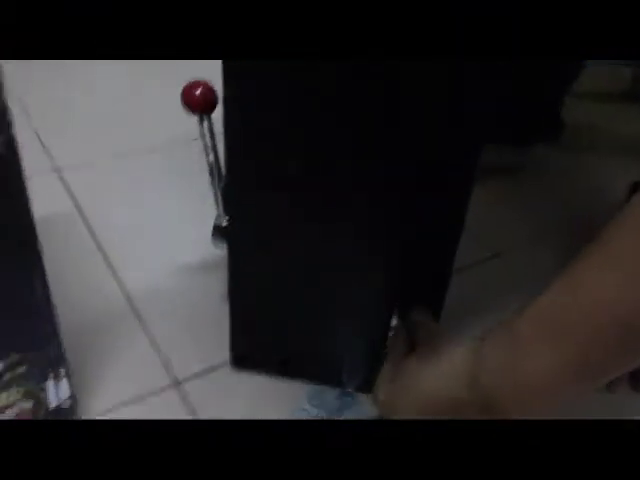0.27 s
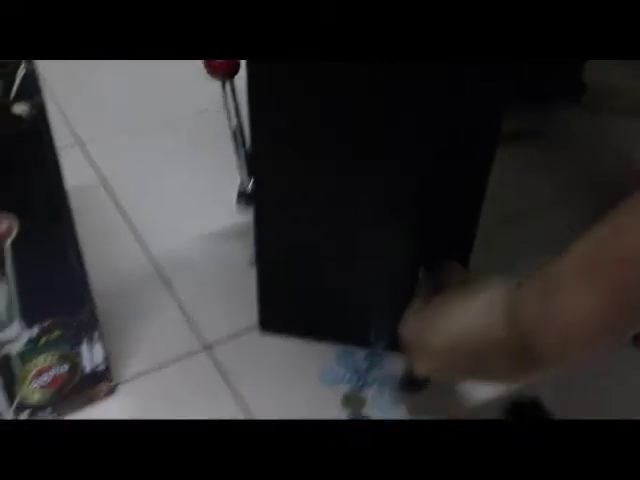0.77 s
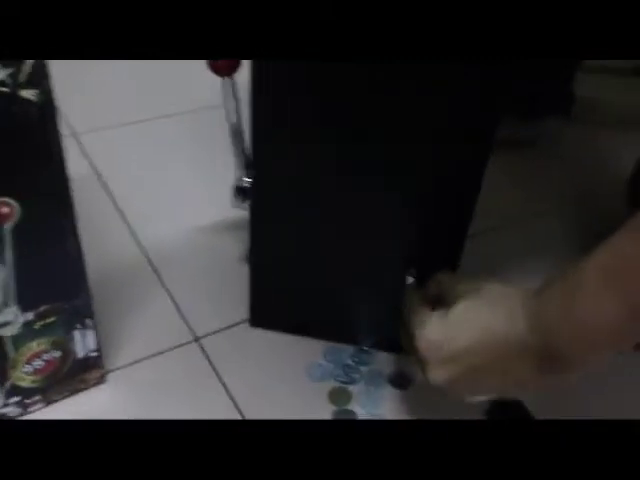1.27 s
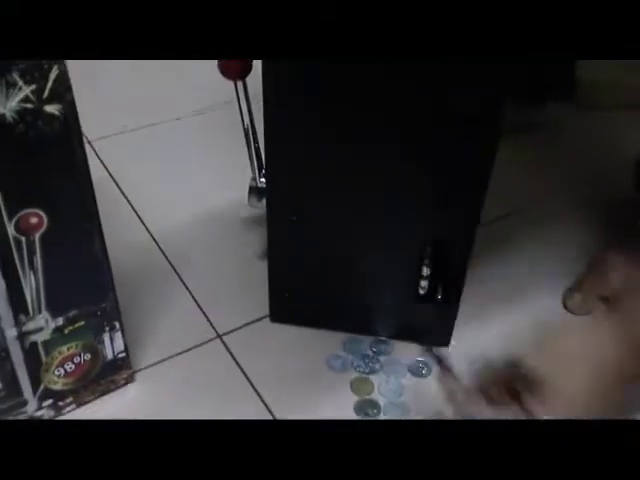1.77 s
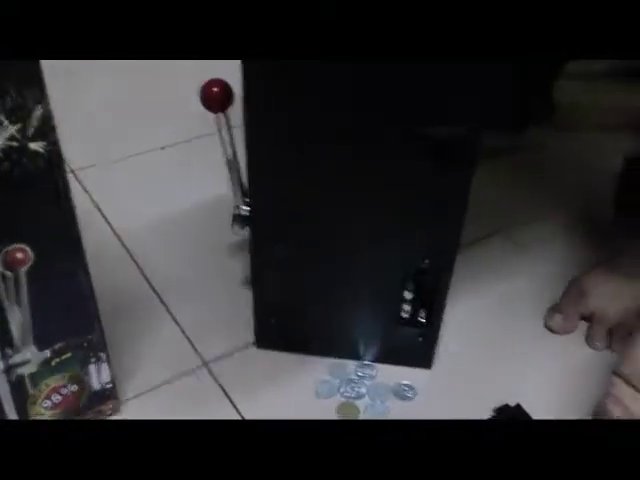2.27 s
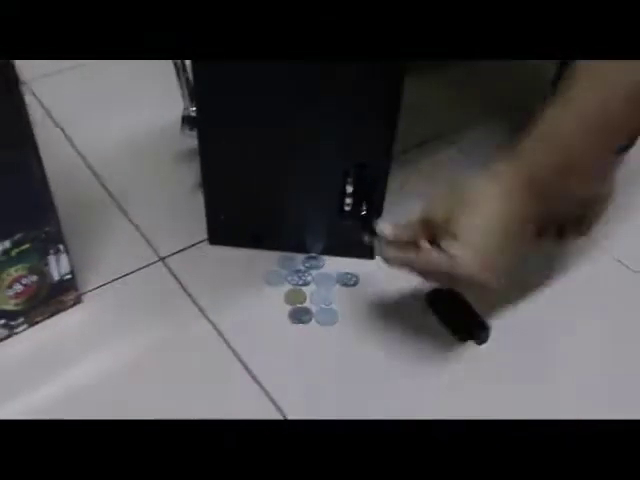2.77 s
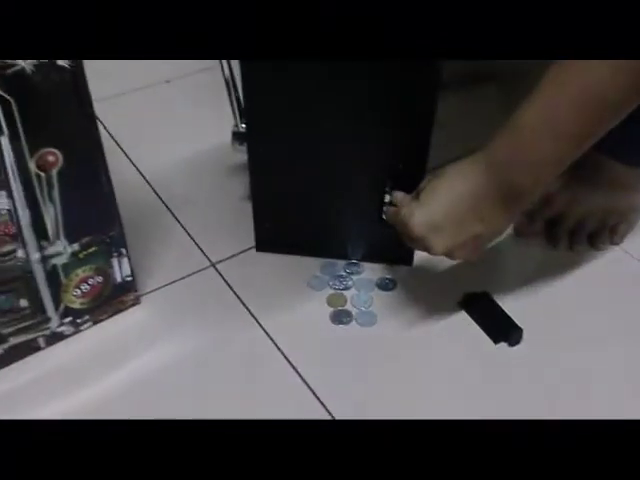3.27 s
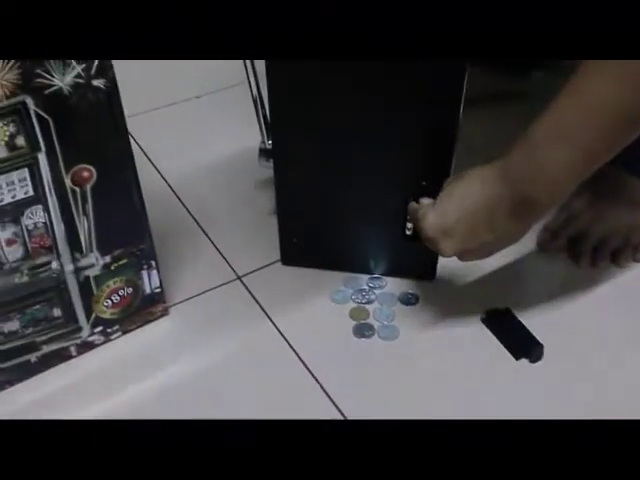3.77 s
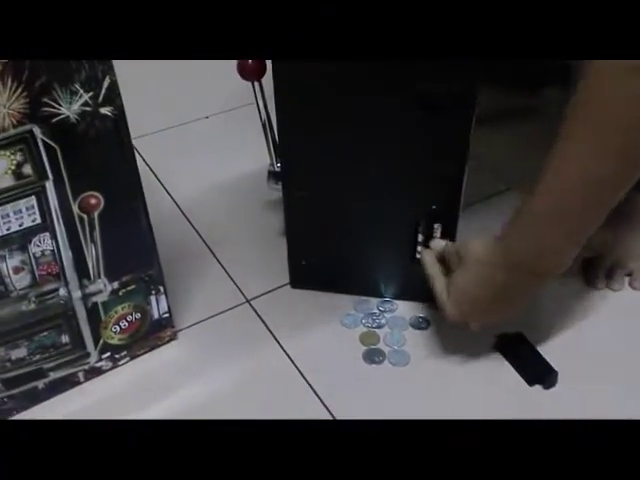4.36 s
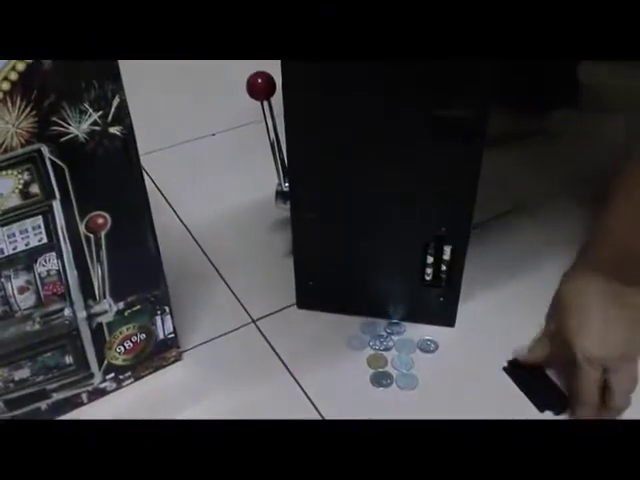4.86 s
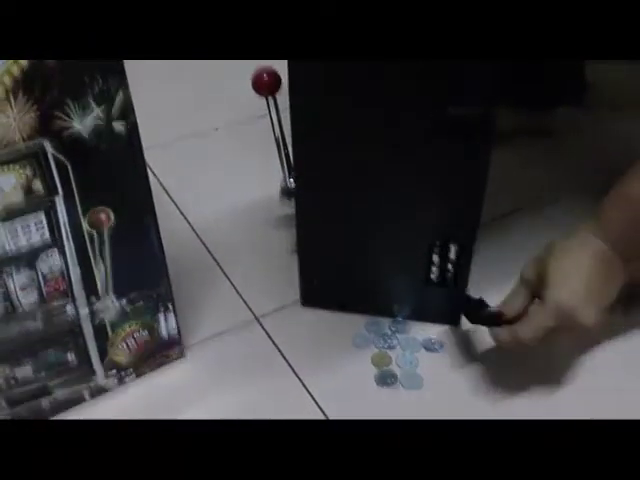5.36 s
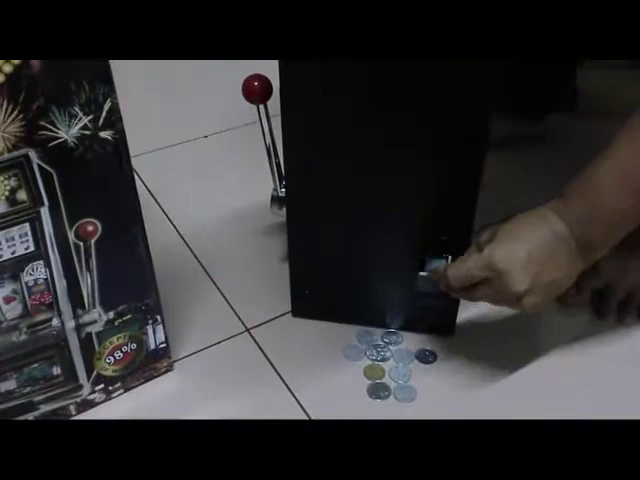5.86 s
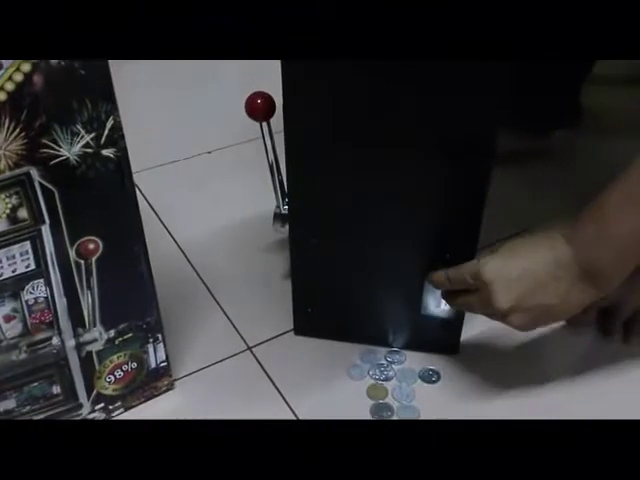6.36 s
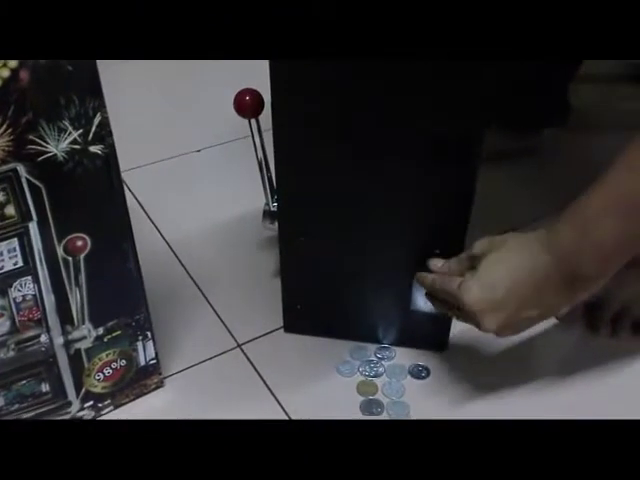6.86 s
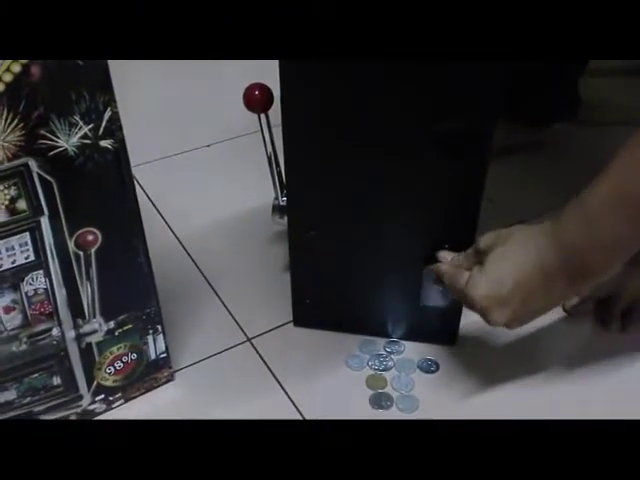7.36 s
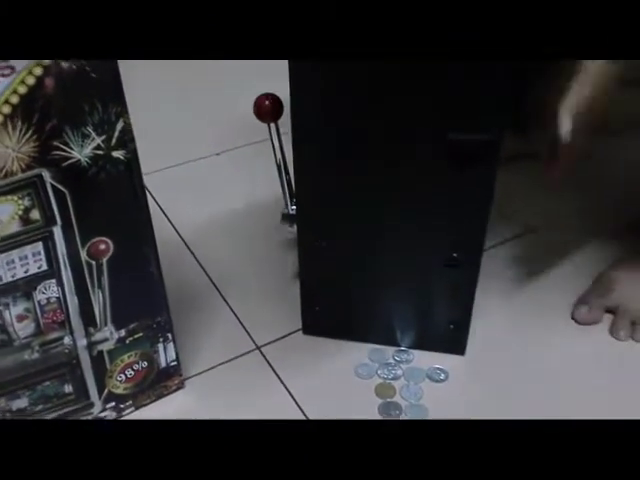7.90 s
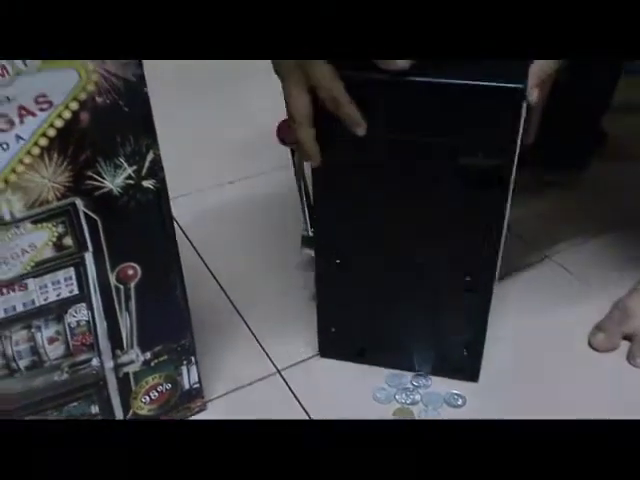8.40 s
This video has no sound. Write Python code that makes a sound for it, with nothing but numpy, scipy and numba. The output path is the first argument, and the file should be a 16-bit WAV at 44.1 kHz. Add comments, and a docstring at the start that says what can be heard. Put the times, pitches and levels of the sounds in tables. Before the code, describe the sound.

A steady low hum and dull room noise run under irregular plastic knocks. First a strong double clack, then small rattles with metallic pings, a loud hollow snap midway, a light lid pickup, a run of catch clicks and finally a hard, bright closing snap. Handheld microphone close by in a live tiled room; low bumps come mostly near the end, and the top end is slightly dull.

```python
"""A hand pries batteries out of a hollow plastic toy cabinet on tiles, presses new ones in, lifts the lid off
the tile and snaps it shut. Each contact is a burst of micro-impacts that rings cabinet, battery bay and clips.
The lid's catch clicks and small parts ring narrowly the same way; a bare tiled room answers as decaying noise.
Behind: an appliance's hum, a thin whine, air noise, rumble and low pulses from bumps on a hand-held camera.
A limiter ducks on the loudest snaps."""
import sys
import numpy as np
from scipy import signal
from scipy.fft import rfft, irfft, next_fast_len
from scipy.io import wavfile
from scipy.ndimage import map_coordinates
from numba import njit

SR = 44100
rng = np.random.default_rng(int(sys.argv[2]) if len(sys.argv) > 2 else 0)


def file_out(sig):
    """Save sig as 16-bit WAV at sys.argv[1]."""
    # one column per channel
    cols = np.atleast_2d(sig).T
    # limit, then scale
    lim = np.clip(cols, -1, 1)
    pcm = np.round(lim * 32767).astype(np.int16)
    wavfile.write(sys.argv[1], SR, pcm)


N = 380583  # samples
SIZE = 8192  # samples of one direct ring
GRID_HZ = np.fft.rfftfreq(SIZE, 1 / SR)


def amp(db):
    """Gain of a level in dB."""
    return 10 ** (np.asarray(db) / 20)


def unit(x):
    """x at rms 1."""
    return x / np.sqrt(np.mean(x ** 2) + 1e-20)


def along(points, hz):
    """Interpolate (Hz, value) points on a log frequency axis."""
    point_hz, value = np.transpose(points)
    return np.interp(np.log(hz + 1), np.log(point_hz + 1), value)


def wobble(knots_per_s):
    """A smooth random curve through normal draws."""
    coarse_s = np.arange(0, N / SR + .001, .001)
    knots = rng.standard_normal(int(N * knots_per_s / SR) + 4)
    curve = map_coordinates(knots, [coarse_s * knots_per_s])
    return np.interp(np.arange(N) / SR, coarse_s, curve)


def filtered(x, response):
    """x times a response of frequency."""
    m = next_fast_len(len(x) + 8192)
    spectrum = rfft(x, m) * response(np.fft.rfftfreq(m, 1 / SR))
    return irfft(spectrum, m)[:len(x)]


def noise(density):
    """Coloured noise of rms 1."""
    return unit(filtered(rng.standard_normal(N), lambda hz: amp(along(density, hz))))


def tone(hz, drift_rad):
    """A sine of rms 1 whose phase drifts slowly."""
    start_rad = rng.uniform(0, 2 * np.pi)
    phase = 2 * np.pi * hz * np.arange(N) / SR + drift_rad * wobble(2.7) + start_rad
    return np.sqrt(2) * np.sin(phase)


MAINS_HZ = 100
# weaker hum tones: (frequency [Hz], mean rms level [dB], wavering [dB])
HUM_TONES = [(118, -59, 3.5), (147, -59, 2), (163.5, -51.5, 1.5), (200, -60, 2), (1079, -64, 2)]


def hum():
    """An appliance's mains hum with weaker wavering tones."""
    mains = amp(-41 + .6 * wobble(3)) * tone(MAINS_HZ, drift_rad=.15)
    weaker = sum(amp(db + waver_db * wobble(4)) * tone(hz, drift_rad=0.185) for hz, db, waver_db in HUM_TONES)
    return mains + weaker


# thin tone: (mean frequency [Hz], sweep rate [1/s], sweep scale [Hz], rms level [dB])
WHINE_TONE = (7792, 24, 80, -76)


def whine():
    """A steady-level tone whose pitch jumps up and slides back many times a second."""
    mean_hz, sweeps_per_s, sweep_hz, db = WHINE_TONE
    cycle = np.arange(N) * sweeps_per_s / SR % 1
    slide = np.exp(-cycle / .3)
    pitch_hz = mean_hz + sweep_hz * (slide - slide.mean())
    return amp(db) * np.sqrt(2) * np.sin(2 * np.pi * np.cumsum(pitch_hz) / SR)


# dips in air noise and knocks: (centre [Hz], half-width [Hz], depth [dB])
DIPS = [(7690, 45, 15), (8110, 70, 18)]


def gaps(hz):
    """Response with two narrow dips beside the whine."""
    return amp(-sum(depth_db / (1 + ((hz - centre) / width) ** 2) for centre, width, depth_db in DIPS))


# room noise and hiss: (frequency [Hz], relative density [dB])
AIR_DENSITY = [(140, -43), (230, -41.5), (253, -8), (288, 1), (317, -6.5), (338, 0.5), (489, -6),
               (643, -8.5), (859, -4), (1110, -8), (1350, -11.5), (1800, -19), (10700, -35.5), (13900, -68),
               (22000, -120)]


def air():
    """Coloured noise, slowly wavering, with the dips beside the whine."""
    return amp(-47.5 + 0.91 * wobble(2.44)) * filtered(noise(AIR_DENSITY), gaps)


# handling rumble: (frequency [Hz], relative density [dB])
RUMBLE_DENSITY = [(12, -28), (30, -1), (60, -4), (120, -10), (230, -8), (330, -35.5)]


def rumble():
    """Low handling noise of uneven level."""
    return amp(-53.5 + 1.9 * wobble(4.1)) * noise(RUMBLE_DENSITY)


def background():
    """All continuous sources together."""
    return hum() + whine() + air() + rumble()


BUMP_HZ = 46
# bumps on the camera body: (centre time [s], strength before pulse shaping [dB])
CAMERA_BUMPS = [(2.299, -33), (4.45, -35), (4.844, -26), (6.731, -23.5), (7.89, -26), (8.001, -22.5),
                (8.35, -21.5), (8.388, -21.5), (8.53, -29)]


def bumps():
    """Fingers shifting on the camera push the microphone: a 46 Hz sine under a bell shorter than a cycle."""
    out, half = np.zeros(N + SR), SR // 20
    cycles = np.arange(-half, half) / SR * BUMP_HZ
    push = np.exp(-(cycles / 0.15) ** 2) * np.sin(2 * np.pi * cycles + 0.58)
    for s, db in CAMERA_BUMPS:
        out[round(s * SR) - half:][:len(push)] += amp(db) * push
    return out[:N]


# reverberation: (frequency [Hz], 60 dB decay time [s])
WALL_DECAY = [(200, 0.87), (1000, 0.83), (4000, 0.61), (10000, 0.51)]


def room(x):
    """The answer of floor and furniture dies fast; that of the walls builds up and dies by frequency."""
    hz, t, z = signal.stft(rng.standard_normal(SR * 3 // 4), SR, nperseg=256)
    build_up = 1 - np.exp(-t / 0.004)
    walls = amp(-60 * t / along(WALL_DECAY, hz)[:, None]) * build_up
    floor = amp(12.5 - 60 * t / 0.036)
    tail = signal.istft(z * (walls + floor), SR, nperseg=256)[1][128:]
    return signal.fftconvolve(x, tail / np.linalg.norm(tail))


def chattering(chatter_s):
    """Spiky micro-impacts that swell and die within about the chatter time (held to 0.3-90 ms)."""
    u = np.arange(SR // 8) / SR / np.clip(chatter_s, 3e-4, .09)
    swell = np.exp(-2 * u) * (1 - np.exp(-u / 0.062))
    return swell * rng.standard_normal(len(u)) ** 3


def modal(modes, favoured_hz, favour_db, spread, widen):
    """Responses of a part's modes; the spot hit favours those within a relative spread of favoured_hz."""
    hz, width, db = np.transpose(modes)[:, :, None]
    db = db + favour_db * np.exp(-(np.log(hz / favoured_hz) / spread) ** 2)
    ring = 1j * GRID_HZ * width / (hz * hz - GRID_HZ ** 2 + 1j * GRID_HZ * width * widen)
    above = GRID_HZ / hz.max()  # little is radiated above the part's top mode
    return amp(db) * ring / (1 - above ** 2 + 1.4j * above)


def struck(force, peak_db, modes, favoured_hz, favour_db, spread):
    """The direct ring at its peak level, and its smoother power spectrum averaged over all directions."""
    sign = (-1.0) ** np.arange(len(modes))
    response = sign @ modal(modes, favoured_hz, favour_db, spread, widen=0.46)
    near = irfft(rfft(force, SIZE) * response)
    near *= amp(peak_db) / np.max(np.abs(near))
    # a ring ruled by few modes sounds alike in all directions
    blur = 1 + 2.2 * np.exp(-max(favour_db, 0) / 8)
    power = np.sum(np.abs(modal(modes, favoured_hz, favour_db, spread, widen=blur)) ** 2, axis=0)
    same_energy = np.sum(near ** 2) * SIZE / (2 * np.sum(power))
    return near, power * same_energy


def causal(power):
    """The shortest causal pulse with this power spectrum, by folding its cepstrum."""
    cepstrum = irfft(np.log(power + 1e-12 * power.max()) / 2)
    cepstrum[1:SIZE // 2] *= 2
    cepstrum[SIZE // 2 + 1:] = 0
    return irfft(np.exp(rfft(cepstrum)))


# battery springs, and at 4.86 s the lid lifted off the tile:
# (time [s], direct peak level [dB], favoured mode [Hz])
SMALL_PART_PINGS = [(.763, -53, 5100), (1.232, -41, 10500), (1.245, -41, 8457), (1.268, -45, 9700),
                    (2.996, -30.5, 1520), (3.246, -45, 3860), (3.271, -41, 3817), (3.272, -36.5, 6675),
                    (3.282, -45, 2800), (3.33, -41.5, 2870), (4.862, -33, 6150), (4.863, -45, 3817),
                    (4.864, -55, 9800)]
# small-part modes: (frequency [Hz], nominal width [Hz], relative level [dB])
PING_MODES = [(1533, 16, 11), (2774, 53, -6), (3776, 30, 3), (4960, 48, -1), (6150, 330, -8),
              (6640, 19, -17), (8500, 55, -2), (9620, 60, -9), (10200, 84, -1), (10500, 40, -10)]


def pings():
    """Narrow rings of small parts: battery springs, and once the lid lifted off the tile."""
    return [(s, [struck(chattering(0.017), db, PING_MODES, hz, 30.5, .05)]) for s, db, hz in SMALL_PART_PINGS]


BAY_DB, CLIP_DB = -6.5, -16  # bay offset before its extra growth; clips relative to catch
BAY_GROWS_DB_PER_DB = .3  # extra bay level per dB of catch level
# plastic catch modes: (frequency [Hz], nominal width [Hz], relative level [dB])
CATCH_MODES = [(2970, 240, -1), (3180, 230, 2.5), (3530, 200, 1.5), (4010, 220, -4.5), (4730, 360, -9.5),
               (5540, 440, -16.5)]


def click(cabinet_db, catch_db, body_hz, chatter_s):
    """The catch rings in a narrow band and shakes the cabinet with it."""
    ring = struck(chattering(chatter_s), catch_db, CATCH_MODES, CATCH_MODES[1][0], 24, 10)
    bay_db = (1 + BAY_GROWS_DB_PER_DB) * catch_db + BAY_DB
    return [ring] + contact(cabinet_db, bay_db, catch_db + CLIP_DB, body_hz, CATCH_MODES[-1][0], chatter_s)


# lid catch: (time [s], cabinet level before lean [dB], catch direct peak level [dB],
# favoured cabinet mode [Hz], chatter before limits [s])
CATCH_CLICKS = [(5.465, -29, -25.5, 1080, 0.0019), (5.476, -33, -44, 565, .08), (5.53, -39, -47, 604, 0.1),
                (5.585, -37.5, -50, 760, 0.061), (5.643, -38, -41, 860, .002),
                (5.744, -21.5, -9, 1100, 0.0016), (5.934, -34.5, -37, 860, 0.011),
                (5.961, -33, -36, 1000, 0.0065), (5.980, -28, -38, 890, 0.0063),
                (6.111, -42, -53, 1600, 0.0078), (6.1805, -33, -20, 990, 0.0032),
                (6.768, -41.5, -37.5, 2030, 0.0023)]


def clicks():
    """Timed clicks of the lid's catch."""
    return [(s, click(*row)) for s, *row in CATCH_CLICKS]


# box and wall get equal peaks at EVEN_HZ; a higher favoured mode shifts the sound to the wall
EVEN_HZ, WALL_DB_PER_OCTAVE = 880, 13
# modes of box, wall, battery bay, metal clips: (frequency [Hz], nominal width [Hz], relative level [dB])
BOX_MODES = [(196, 55, -15.5), (343, 24, -2.5), (458, 120, -12.5), (662.4, 35, -1.5), (849, 66, -5),
             (1042, 136, -3.5)]
WALL_MODES = [(1150, 85, 7), (1529, 490, 20.5), (1450, 97, -2.5), (2037, 350, 16.5), (2620, 1100, -4)]
BAY_MODES = [(2942, 240, 11), (3280, 800, 7), (3770, 430, 5), (3780, 450, -13), (4106, 870, 3),
             (4830, 400, 3), (5250, 400, 4.5), (5960, 1300, 1), (6340, 73, -18)]
CLIP_MODES = [(6920, 660, -3), (8490, 220, -11), (8990, 750, 1.5), (9220, 190, 7), (9880, 2200, 3.5)]


def contact(cabinet_db, bay_db, clip_db, body_hz, bay_hz, chatter_s):
    """One force shakes the four ringing parts."""
    force = chattering(chatter_s)
    lean_db = WALL_DB_PER_OCTAVE * np.log2(body_hz / EVEN_HZ) / 2
    return [struck(force, cabinet_db - lean_db, BOX_MODES, body_hz, 6.7, 0.11),
            struck(force, cabinet_db + lean_db, WALL_MODES, body_hz, 8.0, 0.025),
            struck(force, bay_db, BAY_MODES, bay_hz, 7.5, 0.0983),
            struck(force, clip_db, CLIP_MODES, bay_hz, 7.7, 10)]


# contacts of batteries, fingers and lid, including the lid picked up off the tile at 4.86 s:
# (time [s], cabinet level before lean [dB], bay direct peak [dB], clip direct peak [dB],
# favoured cabinet mode [Hz], favoured bay mode [Hz], chatter [s])
HAND_CONTACTS = [(0.249, -34.5, -35, -45, 644, 3700, 0.0034), (.670, -23.5, -25.5, -35, 655, 3370, 0.0074),
                 (.762, -34.5, -41.5, -46, 660, 3180, 0.018), (1.1494, -14, -7, -21, 1500, 5060, 0.0036),
                 (1.151, -9, -6.5, -35, 1080, 3150, 0.002), (1.266, -28, -22, -21, 905, 4400, 0.014),
                 (1.279, -22.5, -31, -52, 1150, 4300, 0.024), (1.469, -16.5, -13, -20, 1060, 4700, 0.0033),
                 (1.478, -23.5, -24, -42, 1450, 5000, 0.0031), (1.488, -22, -32, -69, 1420, 2920, 0.035),
                 (2.9921, -25.5, -24, -39, 930, 3670, 0.006), (3.005, -28.5, -33, -62, 1020, 3530, 0.015),
                 (3.265, -45, -30, -29.5, 1020, 6300, 0.013), (3.276, -29.5, -30, -54, 970, 6240, 0.011),
                 (3.497, -47, -33.5, -39.5, 1020, 2860, 0.025), (3.513, -42, -36, -36, 950, 2860, .008),
                 (3.662, -24.5, -39, -53, 1000, 3500, .009), (3.67, -29, -37, -62, 850, 3420, 0.025),
                 (3.818, -40.5, -43, -58, 875, 2750, 0.0056), (4.0461, 1.5, 2.5, -11, 806, 4480, 0.0053),
                 (4.856, -46, -27.5, -25.5, 1570, 6160, 0.0067),
                 (4.862, -48, -29.5, -21, 1570, 6160, 0.0066), (5.06, -53, -49, -51, 860, 4300, 0.054),
                 (6.466, -34, -32, -38, 2020, 4500, 0.0023), (7.228, -39.5, -49, -65, 500, 3030, 0.043),
                 (7.248, -34, -42.5, -55, 820, 3200, 0.066), (7.314, -37, -32, -38.5, 1500, 4300, 0.012),
                 (7.321, -17.5, -11.5, -24, 2000, 3530, 0.0062),
                 (7.3375, -8.5, 2.5, 12.5, 780, 6300, 0.0028), (7.569, -45, -39, -52.5, 1500, 4400, 0.0025),
                 (7.678, -41, -39.5, -50, 1500, 4400, 0.0037), (8.210, -45.5, -49.5, -39, 844, 3180, .006)]


def contacts():
    """Timed contacts of batteries, fingers and lid, including the lid picked up off the tile."""
    return [(s, contact(*row)) for s, *row in HAND_CONTACTS]


def cabinet():
    """Contacts, clicks and pings, each heard directly and by way of the room."""
    out = np.zeros(N + 2 * SR)
    for s, parts in contacts() + clicks() + pings():
        near, power = (sum(v) for v in zip(*parts))
        far = amp(-5.5) * room(causal(power))
        start = round(s * SR)
        out[start:][:SIZE] += near
        out[start:][:len(far)] += far
    return out[:N]


def scene():
    """Background, camera bumps and the cabinet, one channel."""
    return (filtered(cabinet(), gaps) + bumps() + background())[None]


@njit
def follow(level, attack, release):
    """A level follower, quick to rise and slow to fall."""
    out, held = np.empty_like(level), 0.0
    for i in range(len(level)):
        held += (level[i] - held) * (attack if level[i] > held else release)
        out[i] = held
    return out


TOP_HZ = 11000


def record(dry):
    """A limiter ducks on loud snaps and recovers; the converter clips softly; a steep low-pass ends the band."""
    attack_s, release_s = 0.001, .17
    held = follow(np.abs(dry[0]), 1 / (attack_s * SR), 1 / (release_s * SR))
    ducked = dry[0] / (1 + (held / amp(-8)) ** 4) ** (1 / 4)
    clipped = ducked / (1 + np.abs(ducked / 0.91) ** 6) ** (1 / 6)
    return filtered(clipped, lambda hz: 1 / (1 + (hz / TOP_HZ) ** 160))[None]


dry = scene()
out = record(dry)
file_out(out)
```